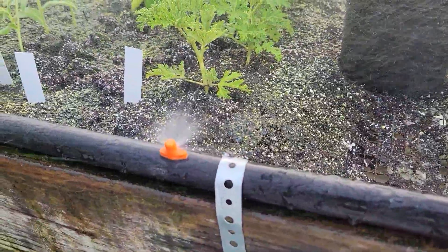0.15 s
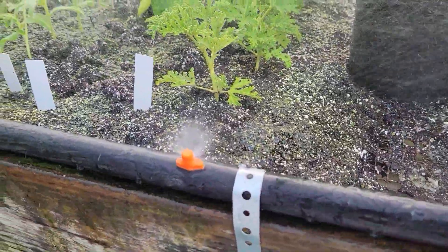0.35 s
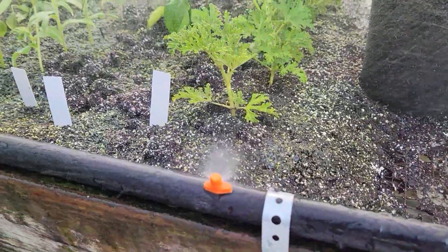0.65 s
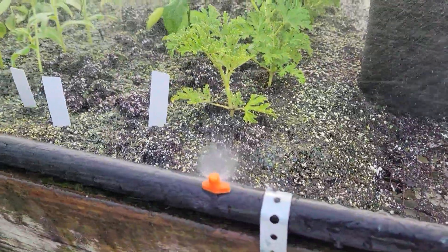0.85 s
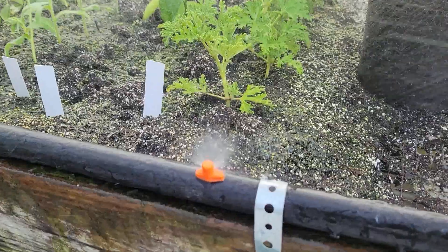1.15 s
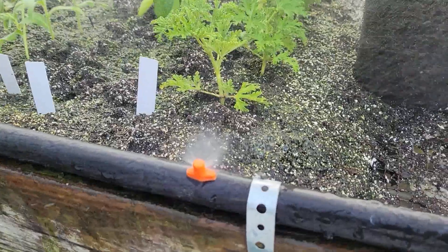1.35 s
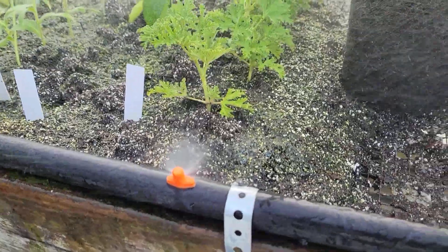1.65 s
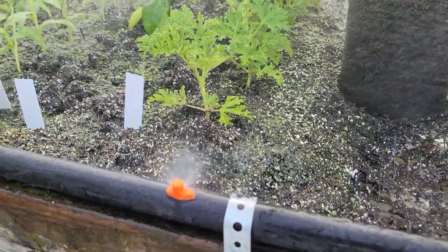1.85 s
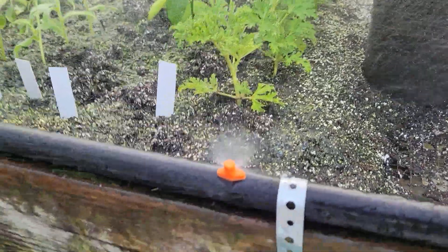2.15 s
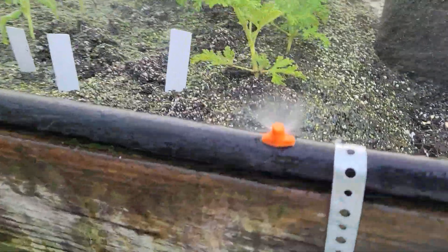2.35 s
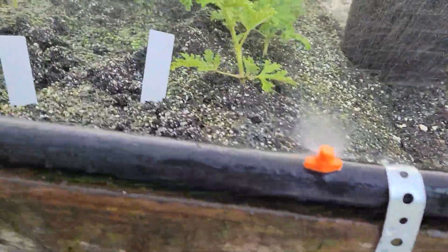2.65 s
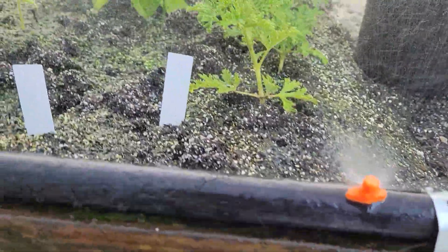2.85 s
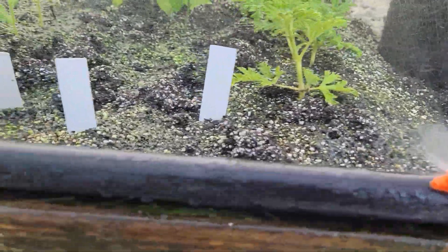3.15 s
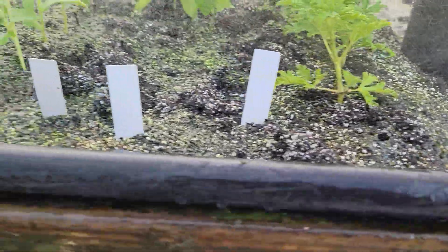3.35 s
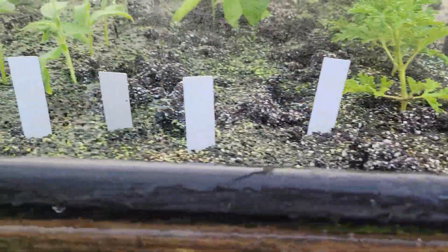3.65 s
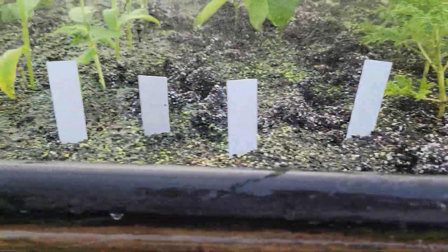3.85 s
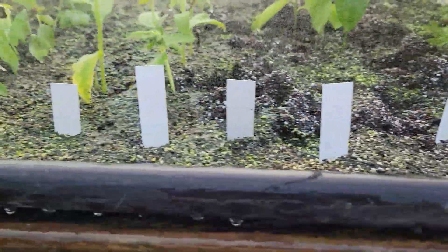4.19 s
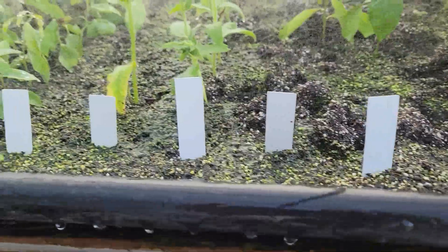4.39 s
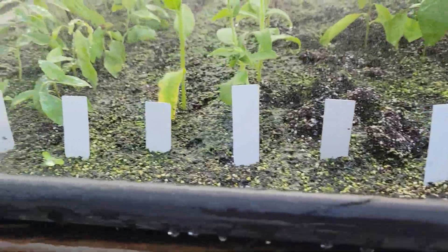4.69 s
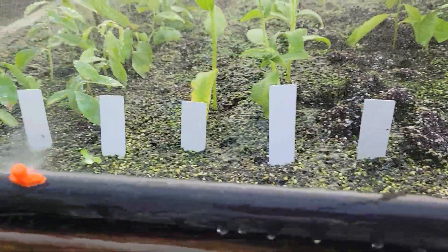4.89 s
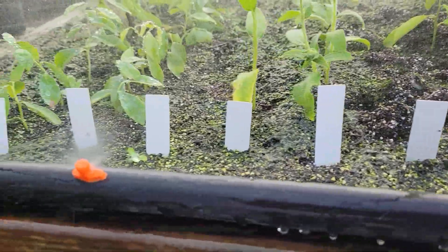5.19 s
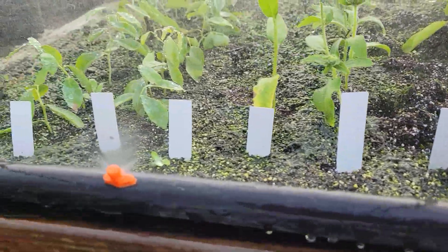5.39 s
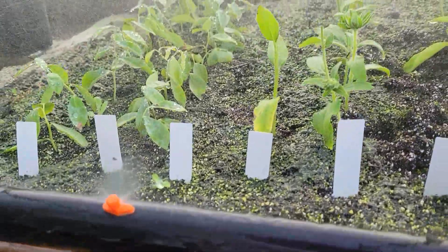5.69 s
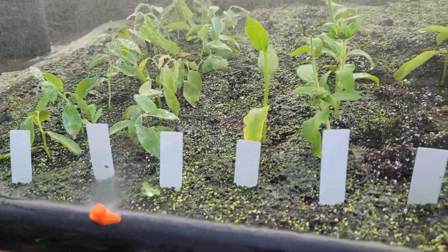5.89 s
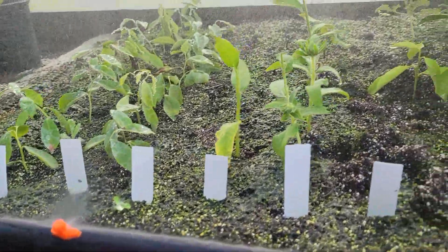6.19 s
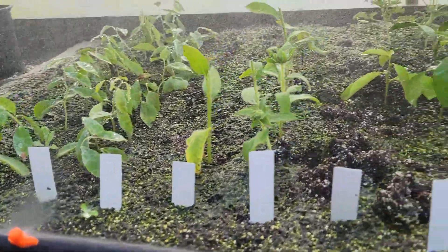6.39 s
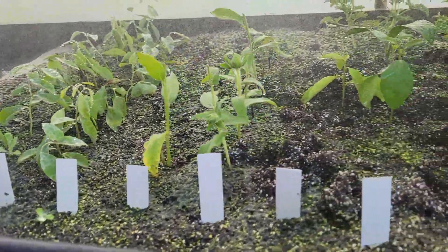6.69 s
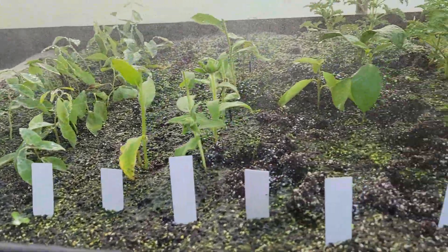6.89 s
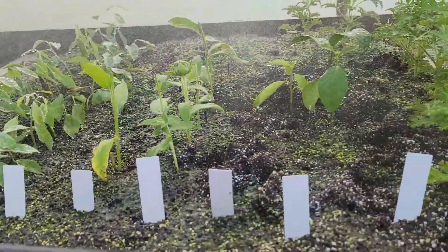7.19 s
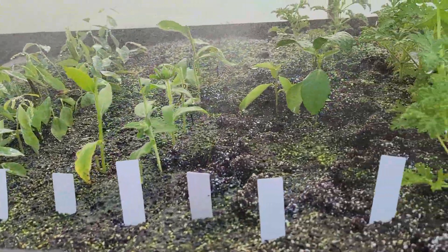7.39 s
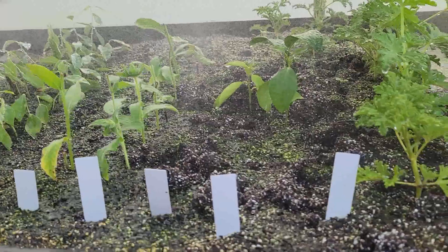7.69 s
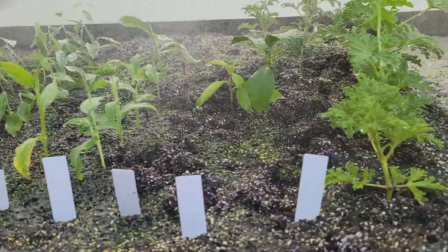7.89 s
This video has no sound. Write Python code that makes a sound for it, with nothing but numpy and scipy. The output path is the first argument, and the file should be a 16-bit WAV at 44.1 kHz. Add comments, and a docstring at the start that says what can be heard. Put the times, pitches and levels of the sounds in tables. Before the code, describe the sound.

A fine, even spray of water hisses close by, drops patter on soil and leaves, shoes crunch briefly, and faint machinery hums far off.

```python
"""Steady hiss of mist nozzles on a plastic pipe over a greenhouse seed bed, heard by a hand-held phone panning along it.
The mist is shaped noise; lags between two ports a hand apart place each nozzle. Patter and single drops are
short decaying rings, shifting feet are bursts of grainy noise with a thud, the pipe whistles as narrow noise,
and a far fan or pump hums as low noise with tones on one shaft speed."""
import sys
import numpy as np
from scipy import signal
from scipy.fft import rfft, irfft, next_fast_len
from scipy.io import wavfile
from scipy.ndimage import uniform_filter1d, map_coordinates

SR = 44100
rng = np.random.default_rng(int(sys.argv[2]) if len(sys.argv) > 2 else 0)


def log_audio(samples):
    """Write samples as a 16-bit WAV file to the path given in sys.argv[1]."""
    # one column per channel
    frames = np.atleast_2d(samples).T
    # limit to full scale, then quantise
    limited = np.clip(frames, -1, 1)
    pcm = np.round(limited * 32767).astype(np.int16)
    wavfile.write(sys.argv[1], SR, pcm)


N = 354740  # samples
TOP_HZ = 15800  # the phone's band limit
FRAME = 512  # samples per spectral frame

# Colour of each microphone port with the case behind it. Each row: frequency in Hz, density in dB per Hz.
LEFT_PORT_COLOUR = [(150, -28.5), (430, -19.5), (520, -10.5), (1200, 2.3), (1700, -3), (2200, -5.5),
                    (2750, -9), (3300, -6), (3900, -8.5), (4500, -13), (6600, -7), (7800, -3),
                    (9500, -11.5), (11500, -5), (13700, 3), (15700, 1.5)]
RIGHT_PORT_COLOUR = [(150, -31), (460, -19.5), (530, -7.5), (850, -2.5), (1200, 2), (2200, -5),
                     (2700, -5.5), (3200, -2.5), (4000, -5), (5100, -7.5), (6800, -3), (8200, -5.5),
                     (9200, -8), (11300, -12), (12300, 2), (13600, 4.5), (15700, 0)]


def amp(db):
    """Decibels to a linear gain."""
    return 10 ** (np.asarray(db) / 20)


def unit(x):
    """Each channel scaled to an RMS of one."""
    return x / np.sqrt(np.mean(np.abs(x) ** 2, axis=-1, keepdims=True) + 1e-20)


def along(points, hz):
    """(Hz, value) points read on a log frequency axis."""
    f, v = np.transpose(points)
    return np.interp(np.log(hz + 1), np.log(f + 1), v)


def curves(rows, t=None):
    """Each column after the time, read at times t (every sample by default)."""
    s, *cols = np.transpose(rows)
    t = np.arange(N) / SR if t is None else t
    return [np.interp(t, s, c) for c in cols]


def wobble(rate):
    """A smooth random curve with rate knots a second."""
    knots = rng.standard_normal(int(N * rate / SR) + 4)
    return map_coordinates(knots, [np.arange(N) * rate / SR])


def filtered(x, response):
    """x times a complex response of frequency."""
    m = next_fast_len(N + SR // 4)
    return irfft(rfft(x, m) * response(np.fft.rfftfreq(m, 1 / SR)), m)[..., :N]


def lagged(hz, ms):
    """Phase ramps that make the left port lag by ms, half on each side."""
    sides = np.array([1, -1]).reshape((2,) + (1,) * np.ndim(hz))
    return np.exp(-1j * np.pi * hz * ms / 1000 * sides)


def bell(hz, centre_hz, width_hz):
    """A Gaussian bump over frequency, down to 1/e at width_hz from its centre."""
    return np.exp(-((hz - centre_hz) / width_hz) ** 2)


def port_colours(hz):
    """Both ports' colours in dB per Hz, left first."""
    return np.array([along(LEFT_PORT_COLOUR, hz), along(RIGHT_PORT_COLOUR, hz)])


def left_right(db):
    """Doubled-dB offsets that put the left port db above the right, half on each side."""
    return np.array([db, -db])


def placed_spray(hz, t, z):
    """Nozzles and wet bed reach one port first; scattered spray differs at each port."""
    # Places along the bed. Each row: time in seconds, lag of the left port in ms,
    # strength in dB against the scattered spray.
    crossing_place = [(0, -0.091, -3.5), (.7, -0.13, -7), (1.6, -0.135, -4), (2.3, -0.13, -3),
                      (2.65, -0.13, 0.5), (3.1, -0.0079, -1), (3.6, 0.17, -3.5), (4.5, 0.14, -20),
                      (6, .4, -29.5), (7, 0.36, -13), (8.04, 0.1, -2)]  # a near nozzle
    left_place = [(0, -0.45, -18), (2.8, -0.27, -25), (3.5, -0.58, -15), (4.1, -0.55, -10),
                  (5, -0.46, -5.5), (5.7, -0.4, 0.5), (6.3, -0.433, -5), (7.1, -0.49, -8.5),
                  (8.04, -0.3, -5.5)]  # a near nozzle on the left
    landing_place = [(0, 0.19, -5.5), (2.4, 0.1, -11), (3.3, -0.21, -16), (4.1, -0.53, -18), (5, -0.26, -2),
                     (5.7, -0.21, 4.5), (6.3, -0.287, 0), (7.1, -0.37, -2.5), (8.04, -0.24, -4)]  # the patch of bed where spray lands
    far_place = [(0, -0.58, 6), (3, -0.51, -7), (6.5, -0.52, 2), (8.04, -0.53, 3)]  # a nozzle far along the pipe to the left
    # How far each stands out of the scattered spray. Each row: frequency in Hz, added strength in dB.
    crossing_jet = [(300, -0.5), (1200, 2.5), (2400, -6.5), (3500, -0.5), (5000, -1.5), (7000, 1.5),
                    (10000, -14), (14000, -8)]
    left_jet = [(300, 4.5), (1200, -5), (2400, -7.5), (3500, 4.5), (4900, -14), (6200, -1), (7600, 5.5),
                (9500, -12), (13000, -2)]
    landing_splash = [(300, -8), (1200, 0.5), (2400, -7), (3500, -4.5), (4900, -1.5), (6300, -2),
                      (7600, 3.5), (9500, -24), (13000, -15)]
    pipe_jets = [(300, -1.5), (1300, 3.5), (2500, -10), (4000, -16), (14000, -18)]  # the further nozzles, on each side
    far_jet = [(300, -25), (2300, -14.5), (2800, -2), (3200, -12), (14000, -26)]
    sources = [(crossing_place, crossing_jet), (left_place, left_jet), (landing_place, landing_splash),
               ([(0, -0.39, 0)], pipe_jets), ([(0, 0.36, 0.0093)], pipe_jets), (far_place, far_jet)]
    total, power = z[:2], 1  # the scattered spray
    for noise, (place, jet) in zip(z[2:], sources):
        ms, db = curves(place, t)
        gain = amp(db + along(jet, hz))
        total = total + gain * noise * lagged(hz, ms)
        power = power + gain ** 2
    # small random rises and falls of level over time and frequency
    level_field = uniform_filter1d(rng.standard_normal(z.shape[1:]), size=4, axis=0)
    level_field = uniform_filter1d(level_field, size=10, axis=1)
    return total / np.sqrt(power) * amp(1.05 * level_field / level_field.std())


def spray_ranges(hz, t):
    """Power of the spray from low wash to finest mist, each range swelling and leaning in its own measure."""
    # Slow swings as the phone moves along the bed. Each row: time in seconds, overall swell in dB,
    # lean to the left in dB, swell of the jets' hiss in dB.
    phone_moves = [(0, 0, 0, 0), (1.2, 0.5, 0.7, 0.5), (2.5, 1.5, -0.5, 0), (3.1, 0.9, -0.5, 0),
                   (3.55, 1, -4, -2), (4.1, 1.5, -0.7, -4), (4.8, 0.5, 1.5, -0.6), (5.55, -0.2, 3, 0.7),
                   (6.15, -1, 1.5, 1), (6.55, -1, 0, -0.7), (7.2, 0.5, -1, 0.5), (8.04, 1.5, -3, -1.5)]
    # The finest mist at the orifices. Each row: time in seconds, level in dB, left over right in dB,
    # brightening above the pivot in dB per kHz.
    finest_mist = [(0, -35, 4, 0.5), (0.9, -36, 2.5, 0), (1.6, -36, 3, 0.5), (2.2, -38, 1, 1),
                   (3, -33.5, 0.5, 0), (3.75, -34, 3, 0.5), (4.1, -36.5, -3, 1.7), (4.9, -33, 0, 1.3),
                   (5.5, -34, 2, 0.5), (5.75, -34, 3.5, 1.5), (5.82, -37, 3, 1.5), (6.2, -36.5, 5, 1),
                   (6.5, -34.5, 3.5, 1.5), (7.3, -39, 3, 2), (7.6, -39, 3, 2), (8.04, -35.5, 3, 1)]
    # Below it: low wash, droplets landing on soil and leaves, the spray fan tearing into drops, the jets,
    # and the range that the case shades. Each row: from Hz, to Hz, level in dB, left over right in dB,
    # share of the overall swell, share of the lean, share of the jets' swell.
    lower_ranges = [(120, 434, -55, -1, 1.06, 2, 0.22), (485, 2410, -40.5, 1.54, 0.9, 0.83, 0.2),
                    (2530, 5630, -40.5, -3, 1, 0.084, 0.15), (5750, 8600, -39.5, 0.9, 0, 0.85, 1),
                    (9050, 12100, -44, 3, 6, 0.6, 1)]
    fizz_from_hz, fizz_pivot_hz = 11500, 12500
    swell_db, lean_db, jets_db = curves(phone_moves, t)
    fizz_db, fizz_pan_db, tilt = curves(finest_mist, t)
    ranges = [(fizz_from_hz, SR / 2, fizz_db, fizz_pan_db)]
    for lo, hi, db, pan_db, by_swell, by_lean, by_jets in lower_ranges:
        moving_db = db + by_swell * swell_db + by_jets * jets_db
        ranges.append((lo, hi, moving_db, pan_db + by_lean * lean_db))
    ports = amp(2 * port_colours(hz))
    power = 0
    for lo, hi, db, pan_db in ranges:
        low_edge = 1 + (lo / (hz + 1)) ** 10
        high_edge = 1 + (hz / hi) ** 10
        band = ports / low_edge / high_edge * (hz < TOP_HZ)
        band = band / band.mean(axis=1, keepdims=True)
        power = power + band * amp(2 * db + left_right(pan_db))[:, None]
    return power * amp(2 * tilt * np.maximum(hz - fizz_pivot_hz, 0) / 1000)


def passing_colour(hz, t):
    """Power gain of the fan hiss, jets, patter, wash and gaps as the nozzles pass."""
    # Each row: time in seconds, fan hiss in dB, its left over right in dB, jets' tilt in dB per kHz,
    # dull end of the patter in dB.
    passing = [(0, -3, 1, -2, 1), (.6, -1.5, 1, 0, -1.5), (1.2, -1.5, 2, -.5, 0), (1.9, -0.5, 0.5, -.5, -1),
               (2.3, 0.5, -2, -3, 2.5), (2.7, 2.5, -2, -5.5, 1.5), (3.1, 0, -4, .1, 1),
               (3.6, -0.5, -2, 1, 0.5), (4.1, -2, -1, -1.5, -.5), (4.7, 0, -2, 0.5, -0.5),
               (5.3, 0, -2.5, -2, 2.5), (5.8, -1.5, -3, -2, 2), (6.2, -2.5, -4, 4, 1),
               (6.7, -0.5, -3, 3, -.5), (7.3, 0, -2.5, 1.5, 1.5), (8.04, -1.5, 0.5, -1, 2.5)]
    # The gap between patter and fan hiss. Each row: time in seconds, centre in Hz, gain in dB (negative deepens).
    lower_gap = [(0, 2600, 2), (2.2, 2550, -1.5), (2.7, 2420, -3.5), (3.3, 2400, -2), (3.9, 2600, -1),
                 (6.2, 2670, 0), (6.75, 2650, -1.5), (7.2, 2720, -2), (8.04, 2660, -1)]
    # The gap between fan hiss and jets. Each row: time in seconds, centre in Hz, gain in dB.
    upper_gap = [(0, 5600, -1.3), (4.8, 5900, -0.3), (5.3, 6000, 0), (5.55, 6300, -6), (5.8, 5950, -3),
                 (6.2, 5950, -2), (6.5, 5800, -.3), (8.04, 5700, -.1)]
    # The low wash. Each row: time in seconds, gain in dB.
    low_wash = [(0, 0.5), (.9, -1.5), (2.4, 4), (3.5, -0.5), (4.6, 1.5), (5.6, -1.5), (6.4, -3),
                (7.3, -1.5), (8.04, -6)]
    jets_hz = 7200
    fan_db, fan_pan_db, jets_tilt, dull_db = curves(passing, t)
    lower_hz, lower_db = curves(lower_gap, t)
    upper_hz, upper_db = curves(upper_gap, t)
    wash_db, = curves(low_wash, t)
    fan = bell(hz, 3600, 770) * (2 * fan_db + left_right(fan_pan_db))[:, None]
    jets = 2 * jets_tilt * bell(hz, jets_hz, 1200) * (hz - jets_hz) / 1000
    dull = 2 * dull_db * bell(hz, 770, 160)
    gaps = 2 * lower_db * bell(hz, lower_hz, 290) + 2 * upper_db * bell(hz, upper_hz, 260)
    wash = 2 * wash_db * bell(hz, 231, 90)
    return amp(fan + jets + dull + gaps + wash)


def hollow_colour(hz, t):
    """Power gain of a hollow low-mid colour in each port that drifts as the phone moves."""
    # Each row: time in seconds, peak in Hz, its gain in dB, dip in Hz, its gain in dB.
    left_hollow = [(0, 560, 0.5, 860, 1.5), (2, 520, 2.5, 740, -1), (3.6, 560, 3, 760, -2.5),
                   (5, 720, -1.5, 820, 2.5), (6.5, 560, 1, 630, -5), (8.04, 540, 5.5, 650, -8)]
    right_hollow = [(0, 700, 3, 920, -5), (1.5, 686, 3, 930, -5), (2.8, 700, 1.6, 850, -2.5),
                    (3.7, 560, 3.3, 780, -5), (5, 570, 1.5, 790, -3), (6.2, 565, 2.5, 790, -3),
                    (8.04, 556, 1.5, 720, -4)]
    width_hz = 37
    ports_db = []
    for rows in (left_hollow, right_hollow):
        peak_hz, peak_db, dip_hz, dip_db = curves(rows, t)
        ports_db.append(peak_db * bell(hz, peak_hz, width_hz) + dip_db * bell(hz, dip_hz, width_hz))
    return amp(2 * np.array(ports_db))


def mist():
    """Water torn into droplets hisses as noise; the jets sputter, the finest mist most."""
    hz, t, z = signal.stft(rng.standard_normal((8, N)), SR, nperseg=FRAME)
    hz = hz[:, None]
    power = spray_ranges(hz, t) * passing_colour(hz, t) * hollow_colour(hz, t)
    spray = placed_spray(hz, t, z) * np.sqrt(power)
    fine = 1 / (1 + (9500 / (hz + 1)) ** 6)
    body, fizz = [signal.istft(spray * part, nperseg=FRAME)[1][:, :N] for part in (1 - fine, fine)]
    # quick flutter on top of a slower sway, in dB
    shared = 0.31 * wobble(140) + 0.042 * wobble(4.6)
    port_flutter = 0.68 * np.array([wobble(150), wobble(150)])
    fizz_sway = 0.51 * wobble(22) + 0.3 * wobble(4.1)
    return body * amp(shared + 0.33 * wobble(30)) + fizz * amp(shared + port_flutter + fizz_sway)


def patter():
    """Larger drops gather on leaves and plop down all over the bed: soft rings of scattered pitch and size."""
    drops_per_s = 120
    smallest_db, spread_db = -52.5, 3.5
    middle_hz, spread_octaves, life_cycles = 900, .9, 6.6
    port_db, lag_ms = 4, .4  # at the far sides: gain up and down per port, lag between ports
    count = int(drops_per_s * N / SR)
    when, size = rng.random((count, 2)).T[..., None]
    pitch, pan = rng.standard_normal((count, 2)).T[..., None]
    k = np.arange(SR // 20)
    cycles = k / SR * np.clip(middle_hz * 2 ** (spread_octaves * pitch), 150, 6000)
    envelope = np.exp(-cycles / life_cycles) * (1 - np.exp(-cycles))
    level = amp(smallest_db - spread_db * np.log(size))  # few drops are large
    ring = level * np.sin(2 * np.pi * cycles) * envelope
    side = np.tanh(pan)  # positive is left
    ports = []
    for sign in (1, -1):
        start = np.maximum(when * N - sign * side * lag_ms * SR / 2000, 0).astype(int)
        heard = ring * amp(sign * side * port_db)
        ports.append(np.bincount((start + k).ravel(), heard.ravel(), 2 * N)[:N])
    return np.array(ports)


def drops():
    """Each nearby drop is a short splat: a few ragged cycles that die at once."""
    # Each row: start in seconds, level in dB before the decay, pitch in Hz, life in cycles, left over right in dB.
    ticks = [(2.368, -17, 14100, 8.5, 8), (2.373, -18, 14100, 8.5, 8), (2.7655, -21.5, 2490, 2.4, 2.5),
             (2.9612, -17, 1200, .8, 0.5), (4.574, -27, 2230, 4.6, 7), (6.1562, -21, 2200, 2.2, 5),
             (6.1582, -27, 1400, 1.8, 3)]
    out = np.zeros((2, N + SR))
    for s, db, hz, life, pan_db in ticks:
        cycles = np.arange(900) / SR * hz
        ragged = np.cumsum(0.1 * rng.standard_normal(len(cycles)))
        envelope = np.exp(-cycles / life) * (1 - np.exp(-cycles))
        ring = np.sin(2 * np.pi * cycles + ragged) * envelope
        start = round(s * SR)
        out[:, start:start + len(ring)] += amp(db + np.array([[pan_db], [-pan_db]]) / 2) * ring
    return out[:, :N]


def feet():
    """Soles drag over grit: crunching grains and a dull thud under a soft rise and fall; ports colour the crunch."""
    # Each row: time of the peak in seconds, crunch in dB, rise in seconds, fall in seconds, thud in dB,
    # lag of the left port in ms before the scaling by 0.9 below.
    scuffs = [(.66, -42, 0.035, 0.016, -53, 0.27), (.88, -44, 0.02, 0.05, -57, .24),
              (1.2, -40, 0.024, 0.057, -53, .24), (1.508, -44, .005, .008, -48, 0.17),
              (1.6, -37.5, 0.012, 0.029, -60, 0.13), (1.643, -32.5, 0.017, 0.019, -52, 0.12),
              (1.668, -32, 0.012, .012, -50, 0.13), (1.69, -34, 0.0097, 0.016, -43, .15),
              (1.722, -35.5, 0.018, 0.032, -52, 0.29), (2.155, -42, .008, .012, -62, 0.17),
              (2.197, -33, 0.018, 0.02, -60, 0.14), (2.222, -34, 0.012, 0.038, -53, 0.32),
              (2.265, -43, .015, .03, -52, 0.33), (2.962, -36.5, 0.013, 0.018, -51, 0.055),
              (3.17, -48, .015, 0.022, -54, .2), (3.34, -42, 0.035, 0.044, -56, .29),
              (3.45, -45, .015, .02, -51, .29), (3.8, -46, .012, .025, -51, .25),
              (6.635, -52, 0.014, .02, -54, .2), (7.825, -51, .02, .025, -53, .2)]
    # Colour of the crunch. Each row: frequency in Hz, density in dB per Hz.
    grit_colour = [(250, -9), (500, 8.5), (800, 0.5), (1100, -0.5), (1500, 2), (2200, 6.5), (3000, 5),
                   (3900, 3.5), (5000, 1), (7000, 0.5), (12000, -6.5)]
    # Colour of the thud. Each row: frequency in Hz, density in dB per Hz.
    thud_colour = [(90, -30), (150, -6), (220, -2.5), (340, 1.5), (550, -12), (1000, -30)]
    t = np.arange(N) / SR
    weight, thud = 0, 0
    for s, db, rise, fall, thud_db, _ in scuffs:
        press = np.exp(-((t - s) / np.where(t < s, rise, fall)) ** 2)
        weight = weight + amp(db) * press
        thud = thud + amp(thud_db) * press
    grains = rng.standard_normal((3, N)) * amp(1.1 * wobble(350) + 0.5 * wobble(60))
    direct, *scattered = grains * weight
    hz, frames, z = signal.stft(direct, SR, nperseg=FRAME)
    ms, = curves([(row[0], row[-1]) for row in scuffs], frames)
    direct = signal.istft(z * lagged(hz[:, None] * ms, 0.9), nperseg=FRAME)[1][:, :N]

    def colour(f):
        return amp(along(grit_colour, f) + port_colours(f))

    grid = np.linspace(0, TOP_HZ, FRAME)
    crunch = filtered(direct + 0.89 * np.array(scattered), colour) / np.sqrt(np.mean(colour(grid) ** 2))
    dull = thud * unit(filtered(rng.standard_normal(N), lambda f: amp(along(thud_colour, f))))
    return (crunch + dull) * amp([[-1.2], [1.2]])


def whistle():
    """Water rushing in the pipe rings one narrow resonance, fading as the phone moves on."""
    centre_hz, width_hz = 1092, 37
    start_db, fade_db_per_s, left_over_right_db = -50, 6.5, -6

    def resonance(hz):
        return lagged(hz, -.1) / (1 + ((hz - centre_hz) / width_hz) ** 2)

    note = unit(filtered(rng.standard_normal(N), resonance))
    fade_db = start_db - fade_db_per_s * np.arange(N) / SR
    return note * amp(fade_db + np.array([[left_over_right_db], [-left_over_right_db]]) / 2)


def hum():
    """Far machinery: nearly mono rumble with tones on multiples of one shaft speed; two more set in late."""
    # Level of the rumble. Each row: time in seconds, level in dB.
    rumble_level = [(0, -57.5), (1.5, -58), (2.8, -56.5), (3.6, -60), (4.8, -57.5), (5.6, -60),
                    (6.2, -61.5), (7.1, -64), (8.04, -61)]
    # Colour of the rumble. Each row: frequency in Hz, density in dB per Hz.
    rumble_colour = [(25, -21), (36, -6), (44, -1), (70, 4), (100, -1.5), (150, -8), (220, -15), (400, -57)]
    # Tones throughout, then tones that set in late. Each row: multiple of the shaft speed, level in dB.
    motor_tones = [(3, -63), (4, -63), (5, -56), (6, -65), (12, -71.5)]
    late_tones = [(7, -64), (8, -60.5)]
    shaft_hz, shaft_wander = 14.9, .006  # wander as a fraction of the speed
    late_start_s, late_rise_s, waver_db = 6.4, 0.15, 2
    noise = rng.standard_normal((2, N))
    shared, apart = filtered(noise, lambda hz: amp(along(rumble_colour, hz)))
    rumble = unit(np.array([shared + 0.23 * apart, shared - 0.32 * apart])) * amp(curves(rumble_level)[0])
    sets_in = (1 + np.tanh((np.arange(N) / SR - late_start_s) / late_rise_s)) / 2
    tones = [(k, amp(db)) for k, db in motor_tones] + [(k, amp(db) * sets_in) for k, db in late_tones]
    shaft = 2 * np.pi * shaft_hz * np.cumsum(1 + shaft_wander * wobble(1.533)) / SR
    motor = 0
    for k, gain in tones:
        tone = np.sin(k * shaft + 2 * np.pi * rng.random())
        motor = motor + gain * amp(waver_db * wobble(6.2)) * tone
    return (rumble + motor) * amp([[-.4], [.4]])


def scene():
    """Everything that reaches the two ports, from the spray to the far hum."""
    return mist() + patter() + drops() + feet() + whistle() + hum()


def record(dry):
    """The phone keeps nothing above its band limit."""
    return filtered(dry, lambda hz: hz < TOP_HZ)


dry = scene()
out = record(dry)
log_audio(out)
```